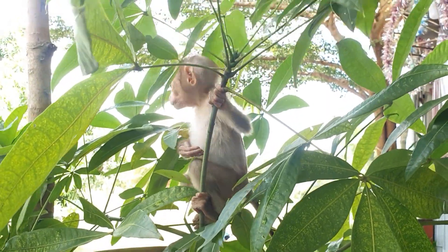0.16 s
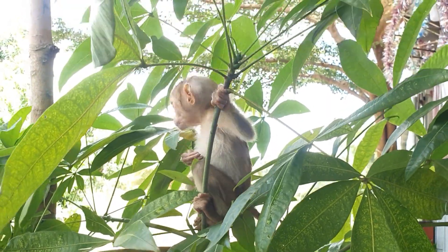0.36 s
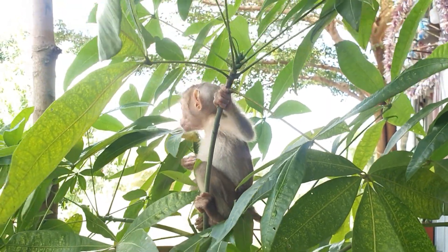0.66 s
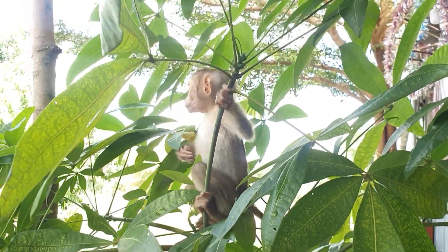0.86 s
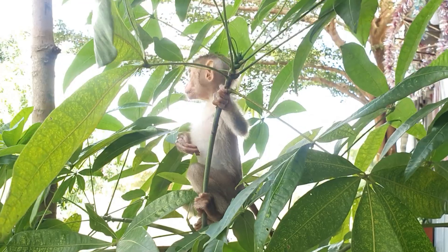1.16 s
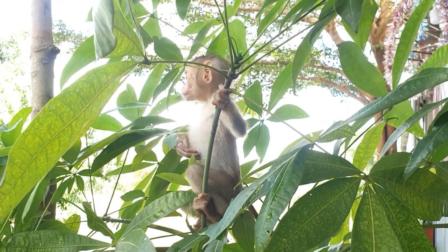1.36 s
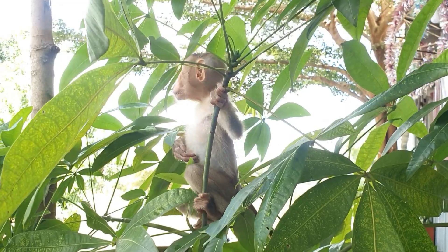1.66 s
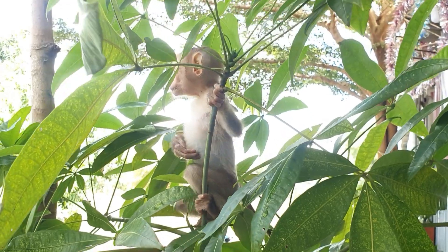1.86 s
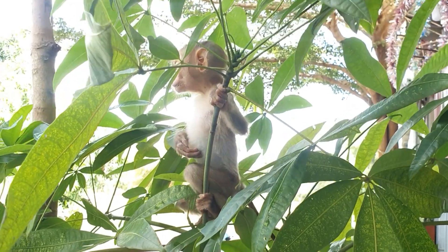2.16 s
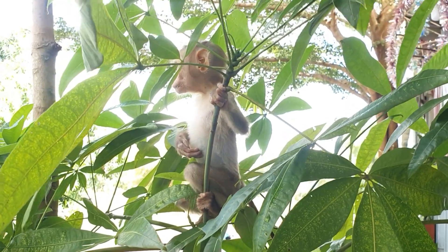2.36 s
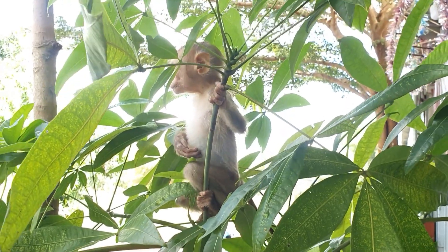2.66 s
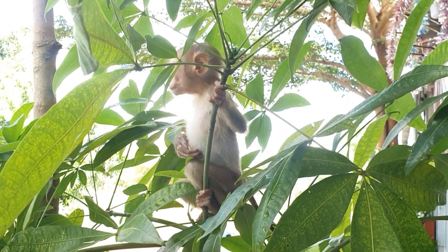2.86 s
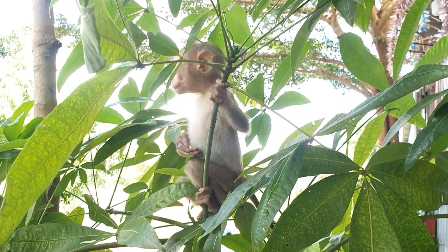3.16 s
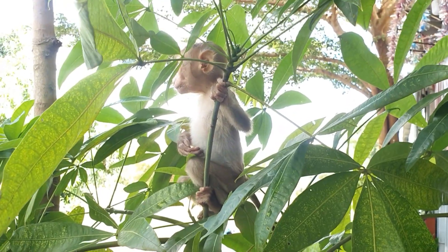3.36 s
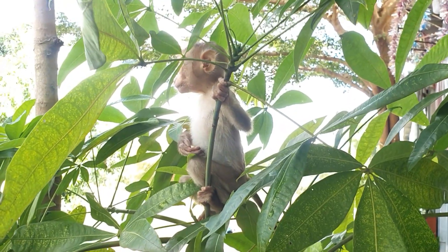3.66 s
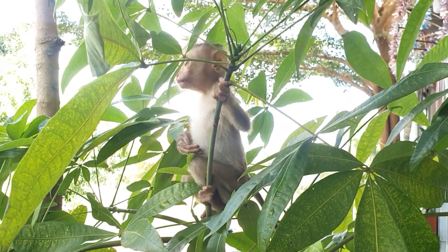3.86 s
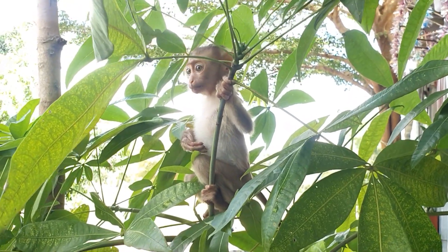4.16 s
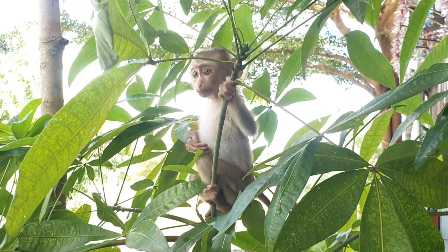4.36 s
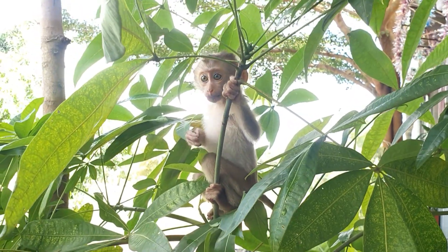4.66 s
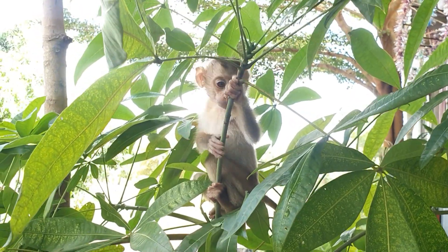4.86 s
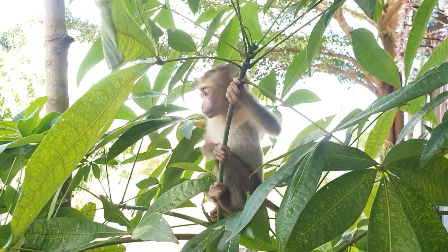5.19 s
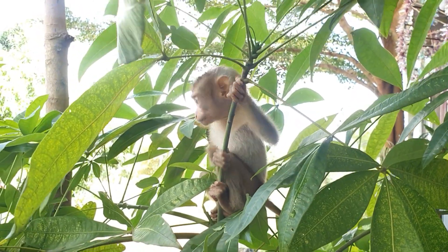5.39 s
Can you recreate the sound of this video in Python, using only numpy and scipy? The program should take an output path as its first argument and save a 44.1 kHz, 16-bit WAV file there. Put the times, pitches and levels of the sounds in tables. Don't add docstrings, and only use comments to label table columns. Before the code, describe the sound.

A handheld microphone, bumped several times with dull thumps, picks up a small monkey in a tree, slightly to the left. After two quieter seconds of far monkey calls, bird chips and shaken leaves, it screams: clear rising squeals, cracked cries, short blips and hoarse barks, each with yard echo. Behind it are a puttering, receding engine, low traffic rumble and thin, pulsing insect hiss.

```python
import sys
import numpy as np
from scipy import signal
from scipy.fft import rfft, irfft, next_fast_len
from scipy.io import wavfile
from scipy.ndimage import uniform_filter1d, map_coordinates

SR = 44100
rng = np.random.default_rng(int(sys.argv[2]) if len(sys.argv) > 2 else 0)


def transcribe(u):
    v = np.clip(np.atleast_2d(u).T, -1, 1)
    q = np.round(v * 32767).astype(np.int16)
    wavfile.write(sys.argv[1], SR, q)


def gain_from_db(level_db):
    decades = np.asarray(level_db, float) / 20
    return 10 ** decades


N = 243873

# frequency_hz, level_db
RUMBLE_COLOUR = [(12, -70), (20, -36), (41, -9), (59, 3.5), (155, -4), (195, -4.5), (269, -4.5), (372, -16),
                 (500, -18), (650, -45.5), (1100, -120)]
MURMUR_COLOUR = [(180, -48), (300, -3.5), (476, -20.5), (533, -11.5), (1100, -15), (1230, -12.5),
                 (3500, -23), (4550, -29), (7700, -120)]
LEAF_COLOUR = [(1470, -18.5), (2500, 11.5), (4000, -4), (4320, -15), (4740, 5.5), (5980, 3), (6970, 0),
               (11500, 8.5), (15800, -35)]
INSECT_COLOUR = [(4710, -15), (8000, -13), (8790, -12), (10500, -14.5), (12300, -1.5), (14900, -11),
                 (15800, -2)]
# frequency_hz, likeness (0 to 1)
LIKENESS = [(60, 0.94), (180, 0.97), (550, 0.64), (1650, 0.018), (4970, 0.022), (15000, 0.024)]
# start_s, end_s, level_db
INSECT_BOUTS = [
    (-.1, 0.494, -62.5),
    (0.61, 1.9, -57.5),
    (1.95, 2.3, -62),
    (2.36, 3.02, -42),
    (3.114, 3.733, -46.5),
    (4.03, 4.567, -45),
    (4.706, 4.998, -66),
]
# time_s, count
FIRINGS = [(.0878, 1), (1.543, 15), (2.057, 20), (3.1059, 30), (4.0358, 39), (4.5541, 44), (5.629, 54)]
# time_s, exhaust_level_db
ENGINE_LEVEL = [(0, -47), (1.3, -45), (2.6, -48), (4.6, -49), (5.53, -52.5)]
# start_s, level_db, centre_hz, width_octaves, decay_to_-60_db_s
BUMPS = [
    (.136, -27, 377, 0.49, 0.033),
    (0.498, -21, 108, 1.17, 0.44),
    (1.951, -38, 403, 0.36, 0.26),
    (3.609, -23, 102, 1.47, 0.11),
]
# start_s, level_db, centre_hz, width_octaves, decay_to_-60_db_s
RUSTLES = [(0.091, -46.5, 3400, 0.54, 0.64), (.5, -55, 770, .02, 2.9), (0.999, -50, 8150, 0.15, 0.31),
           (1.5, -56, 6440, 0.023, 0.67), (1.859, -44, 1570, 0.7, 0.73), (1.865, -50, 5900, 0.84, 0.73),
           (3.399, -35, 2500, 0.36, 0.12), (4.25, -34, 4500, 0.47, 0.14), (5.09, -55.5, 4430, 0.59, 1.2),
           (5.299, -49, 4310, .05, 0.37), (5.47, -57, 6500, 0.077, 0.43)]
# centre_hz, width_octaves, level_db
BRANCH_BANDS = [(1300, 1.1, -42), (4350, 0.19, -47.5), (6400, .59, -47), (8500, .083, -49),
                (12300, 0.14, -44)]
# start_s, level_db, from_hz, to_hz, length_s
CHIPS = [
    (1.134, -51, 6000, 3720, 0.025),
    (1.225, -40.5, 6050, 3360, 0.028),
    (1.322, -49.5, 7250, 5900, 0.021),
    (1.323, -43.5, 5330, 3390, 0.035),
    (4.337, -43.5, 6300, 3160, 0.035),
]
# frequency_hz, decay_to_-60_db_s
YARD_DECAY = [(500, 0.46), (1200, 0.5), (2500, 0.56), (5000, 0.49), (12000, 0.64)]
# frequency_hz, level_db
FACING_AWAY = [(1000, 3), (2500, 0.5), (5000, -3), (12000, 0.5)]
# start_s, length_s, level_db, from_hz, towards_hz
ANSWERS = [
    (0.728, 0.21, -17.5, 1848, 1650),
    (1.014, 0.25, -53.5, 1153, 907),
    (1.736, 0.47, -56.5, 882.4, 880),
    (4.653, 0.44, -43, 1371, 870),
    (5.48, 0.16, -37.5, 854, 845),
]
# left_minus_right_db, dulled_above_hz, brightness_db_per_octave, swell_s, fade_db_per_s
ANSWER_PLACES = [
    (9, 5040, -13.5, 0.022, 114),
    (0, 2700, -12.5, 0.026, 50),
    (-13, 3000, -28, 0.014, 3),
    (5, 12000, -1.5, 0.02, 15.5),
    (4, 3700, -20, 0.043, 3),
]
# frequency_hz, level_db
FAR_THROAT = [(700, -15), (1200, 1), (1850, -24), (2600, -17.5), (3700, -11.5), (4600, -24), (5200, -15),
              (5650, -21), (6300, -24), (15500, -64)]
THROAT = [(500, -6), (850, -20), (1250, 5.5), (1800, 2.5), (2550, -3.5), (3100, -2), (3600, -1.5),
          (4400, -2.5), (5150, -7.5), (5550, -14.5), (6200, -31), (6900, -36), (9000, -32.5),
          (11000, -23.5), (15500, -32.5)]
# centre_hz, width_hz, level_db
RASP_RESONANCES = [(1250, 1100, -5.5), (1650, 470, -1), (2500, 355, -2.5), (3340, 433, 0),
                   (3650, 1290, -5.5), (4850, 630, -18.5), (11700, 3100, -34)]
# frequency_hz, level_db
MOUTH_OPENING = [(300, -29), (900, 0), (1300, 5), (5200, 7), (6200, -8.5), (9500, -8.5), (12000, 0)]
# frequency_hz, left_minus_right_db
LEFT_LEAN = [(500, 3), (1200, 4.5), (2500, 11), (5000, 6.5), (9000, 5), (14000, -2.5)]
MOUTHS = [
    (-14, -8, 1.5, 4, 0),
    (-6, 22, -5, -10.5, -4.5),
    (15, -.5, -15, -9.5, 2.5),
    (-.5, -.5, -12, -34, -34),
    (2.5, -1, -26, -51, -1.5),
    (2, 5, 2.5, -38, -1.5),
    (-5, 0, -14, -7.5, -9),
    (0, -19, 6, -5, 0),
    (14, 12, 13, 1, -2.5),
]
# time_s, pitch_hz, level_db
CLEAR_NOTES = [
    [(2.04, 1650, -53), (2.06, 1650, -29.5), (2.1, 1696, -27), (2.16, 1699, -26), (2.2, 1783, -21),
     (2.24, 1878, -30), (2.265, 1970, -22), (2.285, 2164, -53)],
    [(2.425, 1619, -21.5), (2.462, 1731, -18.5), (2.495, 1834, -23), (2.53, 1824, -15), (2.575, 1846, -15),
     (2.6, 1880, -36)],
    [(2.885, 1451, -32), (2.897, 1513, -19), (2.922, 1507, -21), (2.94, 1470, -56)],
    [(3.505, 1460, -68), (3.525, 1513, -40), (3.545, 1530, -56), (3.56, 1570, -60)],
]
# time_s, pitch_hz, level_db, strain_db
BARKS = [
    [(1.95, 1007, -31.5, 3), (1.985, 1154, -25, 3.5), (2.005, 1203, -22, -2.5), (2.04, 1300, -32.5, 5),
     (2.065, 1390, -24.5, 5)],
    [(3.57, 1226, -76, -3), (3.585, 1287, -31, -9), (3.62, 1608, -30, 10.5), (3.65, 1677, -30, 2),
     (3.68, 1677, -27, 1), (3.735, 1733, -31.5, -13.5), (3.76, 1825, -24.5, 4.5)],
    [(3.98, 1109, -26, -16), (4.003, 971, -25, -9), (4.025, 1141, -17, -10.5), (4.05, 1199, -23.5, -3.5),
     (4.085, 1234, -25, -19), (4.115, 1250, -27.5, -8), (4.14, 1274, -30, -32), (4.16, 1430, -49, -20)],
]
# time_s, pitch_hz, level_db, strain_db
CRACKS = [
    [(2.574, 1721, -35, 9.5), (2.6, 1746, -30.5, -0.5), (2.62, 1770, -28.5, -10), (2.66, 1749, -22, -8),
     (2.685, 1799, -21, -5), (2.72, 1782, -30, -2), (2.75, 1823, -35.5, -86), (2.78, 1870, -17, -29)],
    [(2.895, 1455, -63, -3), (2.922, 1471, -28, -7.5), (2.94, 1718, -25, -34), (3.0, 1835, -28.5, -61),
     (3.03, 1862, -32.5, -42), (3.065, 1867, -34.5, -40), (3.09, 1810, -71, -20)],
]

RING_HZ, HISS_HZ = 2500, 8830


def unit(x):
    return x / np.sqrt(np.mean(x ** 2) + 1e-20)


def along(points, hz):
    f, v = np.transpose(points)
    return np.interp(np.log(hz + 1), np.log(f + 1), v)


def curves(rows, t):
    s, *columns = np.transpose(rows)
    return [np.interp(t, s, column) for column in columns]


def wobble(rate, size):
    knots = rng.standard_normal(int(size * rate / SR) + 4)
    return map_coordinates(knots, [np.arange(size) * rate / SR])


def filtered(x, response):
    m = next_fast_len(x.shape[-1] + 8192)
    shaped = rfft(x, m) * response(np.fft.rfftfreq(m, 1 / SR))
    return irfft(shaped, m)[..., :x.shape[-1]]


def resonant(modes):
    def response(f):
        total = 0
        for k, (centre, width, db) in enumerate(modes):
            damping = 1j * f * width
            total = total + (-1) ** k * gain_from_db(db) * damping / (centre * centre - f * f + damping)
        return total
    return response


def add(track, s, sound):
    start = round(s * SR)
    part = track[..., start:start + sound.shape[-1]]
    part += sound[..., :part.shape[-1]]


def pan(db):
    return gain_from_db([[db / 2], [-db / 2]])


def rush(spectrum, patchy_db):
    z = signal.stft(rng.standard_normal((2, N)), nperseg=512)[2]
    patches = uniform_filter1d(rng.standard_normal(z.shape[1:]), size=6, axis=0)
    patches = uniform_filter1d(patches, size=14, axis=1)
    pair = signal.istft(z * gain_from_db(patchy_db * unit(patches)), nperseg=512)[1][:, :N]

    def mid_side(hz):
        angle = np.arccos(np.clip(along(LIKENESS, hz), -1, 1)) / 2
        return gain_from_db(along(spectrum, hz)) * [np.cos(angle), np.sin(angle)]
    mid, side = filtered(pair, mid_side)
    return unit(np.array([mid + side, mid - side]))


def yard(x, wet_db, gap, facing=False):
    hz, t, z = signal.stft(rng.standard_normal((2, SR * 3 // 4)), SR, nperseg=256)
    tail = signal.istft(z * gain_from_db(-60 * t / along(YARD_DECAY, hz)[:, None]), SR, nperseg=256)[1]
    tail = np.pad(tail / np.linalg.norm(tail[0]), ((0, 0), (round(gap * SR), 0)))
    heard = gain_from_db(wet_db) * signal.fftconvolve(x[None], tail, axes=1)
    direct = np.array([x, np.roll(x, -4)])
    add(heard, 0, filtered(direct, lambda f: gain_from_db(along(FACING_AWAY, f) * (not facing))))
    return heard


def engine_fade_db():
    level_db = curves(ENGINE_LEVEL, np.arange(N) / SR)[0]
    return level_db - level_db.mean()


def traffic_rumble():
    level_db = -47 + 0.76 * engine_fade_db()
    return gain_from_db(level_db + 2.5) * pan(1.2) * rush(RUMBLE_COLOUR, patchy_db=-2.5)


def murmur():
    level_db = -54.5 + 0.43 * engine_fade_db()
    return gain_from_db(level_db) * pan(2.1) * rush(MURMUR_COLOUR, patchy_db=-2.0)


def leaf_hiss():
    return gain_from_db(-66) * pan(4.5) * rush(LEAF_COLOUR, patchy_db=1.5)


def insects():
    rise_s, fall_s = 0.04, 0.07
    t = np.arange(N) / SR
    gain = gain_from_db(-63)
    for start, end, db in INSECT_BOUTS:
        before, after = np.maximum(start - t, 0), np.maximum(t - end, 0)
        gain = gain + gain_from_db(db) * np.exp(-before / rise_s - after / fall_s)
    return gain * gain_from_db(-1.0) * pan(-1.0) * rush(INSECT_COLOUR, patchy_db=-0.5)


def engine():
    s, count = np.transpose(FIRINGS)
    luck = rng.standard_normal((54, 2))
    at = np.interp(np.arange(1, 55), count, s) + 0.00429 + 0.00062 * luck[:, 0]
    bangs = np.zeros(N + SR)
    bangs[(at * SR).astype(int)] = gain_from_db(2.2 * luck[:, 1])
    bangs = bangs[:N] + gain_from_db(-7) * np.roll(bangs[:N], round(.036 * SR))
    pipe = resonant([(193, 270, -1.4), (278, 197, -0.69)])
    block = resonant([(250, 200, 0)])
    thuds = unit(filtered(bangs, lambda f: pipe(f) * block(f)))
    level_db = curves(ENGINE_LEVEL, np.arange(N) / SR)[0]
    return gain_from_db(level_db - 2.0) * pan(0.6) * thuds


def noise_puff(db, hz, octaves, t60, rise):
    t = np.arange(SR // 2) / SR
    a, b = rng.standard_normal((2, len(t)))
    pair = a + min(hz / 1500, 1) * np.array([b, -b])
    band = filtered(pair, lambda f: np.exp(-(np.log2((f + 1) / hz) / octaves) ** 2))
    return gain_from_db(db - 60 * t / t60) * (1 - np.exp(-t / rise)) * unit(band)


def bumps_and_leaves():
    out = np.zeros((2, N))
    shake = [(1.549, db, hz, octaves, 0.54) for hz, octaves, db in BRANCH_BANDS]
    for s, db, hz, octaves, t60 in BUMPS + shake:
        add(out, s, noise_puff(db, hz, octaves, t60, rise=min(0.023, 0.098 * t60)))
    for s, db, hz, octaves, t60 in RUSTLES:
        add(out, s, noise_puff(db, hz, octaves, t60, rise=0.049))
    return out


def bird():
    out = np.zeros((2, N))
    for s, db, top_hz, end_hz, length in CHIPS:
        u = np.arange(0, 1, 1 / (length * SR))
        sweep_hz = end_hz + (top_hz - end_hz) * (1 - u) ** 0.69
        turn = np.pi * np.cumsum(sweep_hz) / SR
        whistle = np.sin(2 * turn) + .15 * np.sin(turn)
        hoarse = .6 + wobble(3000, size=len(u))
        chip = np.sin(np.pi * u) * whistle * hoarse
        add(out, s, pan(3) * yard(gain_from_db(db + 6) * chip, wet_db=-10, gap=.005, facing=True))
    return out


def voice(note, throat, ring_db=0, hiss_db=0):
    t = np.arange(note[0][0], note[-1][0], 1 / SR)
    size = len(t)
    hz, db, half_db, rasp_db, tilt = curves(note, t)
    shake = .035 * np.minimum(gain_from_db(1.6 * rasp_db), 1)
    hz = hz * (1 + .002 * wobble(80, size) + shake * wobble(300, size))
    turn = np.pi * np.cumsum(hz) / SR
    k = np.arange(1, 25)[:, None]
    line_hz = k * hz / 2

    flicker = np.array([wobble(32.3, size) for _ in k])
    flicker = np.sqrt(np.maximum(k / 2 - 1, .05)) * flicker
    lift_db = np.clip(ring_db, 0, 1.5) * np.exp(-((line_hz - RING_HZ) / 300) ** 2)
    line_db = along(throat, line_hz) + lift_db + tilt * np.log2(k / 2)
    line_db = line_db + (k % 2) * half_db + 0.76 * flicker
    lines = gain_from_db(line_db) * (line_hz < SR / 2.8) * np.sin(k * turn + 0.73 * k * k)
    tone = np.sum(lines, axis=0)

    puffs = rng.standard_normal(size) * (1 + .4 * np.sin(2 * turn)) * gain_from_db(2.5 * wobble(250, size))
    throat_rasp = resonant(RASP_RESONANCES)

    def mouth(f):
        ring = ring_db * np.exp(-((f - RING_HZ) / 450) ** 2)
        return gain_from_db(along(MOUTH_OPENING, f) + ring + hiss_db * (f > HISS_HZ))
    rasp = unit(filtered(puffs, lambda f: throat_rasp(f) * mouth(f)))
    soft_ends = np.minimum(1, np.minimum(t - t[0], t[-1] - t) / .008)
    return soft_ends * gain_from_db(db + 2.5) * (tone + gain_from_db(rasp_db) * rasp)


def answer(s, length, db, from_hz, to_hz, bright, swell, fade):
    t = np.linspace(0, length, num=80)
    hz = to_hz + (from_hz - to_hz) * np.exp(-(2.6 * t / length) ** 1.7)
    level_db = db - 34 * np.maximum(1 - t / swell, 0) - fade * np.maximum(t - swell, 0)
    half_db, strain_db = -57 + 0 * t, -44.5 + 0 * t
    opening = -33 * np.exp(-(t / (0.044 * length)) ** 2)
    tilt = bright + 0.34 * (level_db - db) + opening
    return np.transpose([s + t, hz, level_db, half_db, strain_db, tilt])


def far_monkeys():
    out = np.zeros((2, N))
    for row, (side_db, top_hz, *shape) in zip(ANSWERS, ANSWER_PLACES):
        call = voice(answer(*row, *shape), FAR_THROAT)
        call = filtered(call, lambda f: 1 / (1 + (f / top_hz) ** 16))
        add(out, row[0], pan(side_db) * gain_from_db(1) * yard(call, wet_db=1.5, gap=0.023, facing=True))
    return out


def scream(rows, split_db, shut, bright):
    open_s, lag_s = 0.033, 0.029
    t = np.linspace(rows[0][0], rows[-1][0], num=80)
    since = t - t[0]
    hz, db, strain_db = curves(rows, t)
    half_db = np.minimum(split_db + np.interp(t - lag_s, t, strain_db), 11)
    half_db = half_db - 30 * np.exp(-(since / lag_s) ** 4)
    tilt = bright + (shut - bright) * np.exp(-(since / open_s) ** 2)
    return np.transpose([t, hz, db, half_db, strain_db, tilt])


def near_monkey():
    out = np.zeros((2, N))
    clear_strain_db = -27
    clear = [[(*row, clear_strain_db) for row in rows] for rows in CLEAR_NOTES]
    for rows, (ring_db, hiss_db, *shape) in zip(clear + BARKS + CRACKS, MOUTHS):
        share = 0.8 if rows[0][0] > 3.9 else 1
        note = voice(scream(rows, *shape), THROAT, ring_db, hiss_db)
        heard = gain_from_db(-4.5) * yard(note, wet_db=3.5, gap=.008)
        leaning = filtered(heard, lambda f: gain_from_db(share * along(LEFT_LEAN, f) * [[.5], [-.5]]))
        add(out, rows[0][0], leaning)
    return out


def scene():
    background = traffic_rumble() + murmur() + leaf_hiss() + insects() + engine()
    return background + bumps_and_leaves() + bird() + far_monkeys() + near_monkey()


def top_cut(x):
    return signal.sosfilt(signal.butter(12, 16320, fs=SR, output="sos"), x)


def record(dry):
    mix = filtered(dry, lambda f: f < 15850)
    return top_cut(mix)


dry = scene()
out = record(dry)
transcribe(out)
```